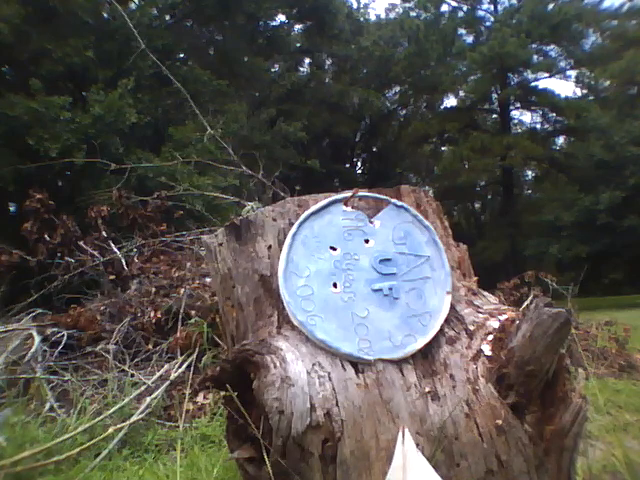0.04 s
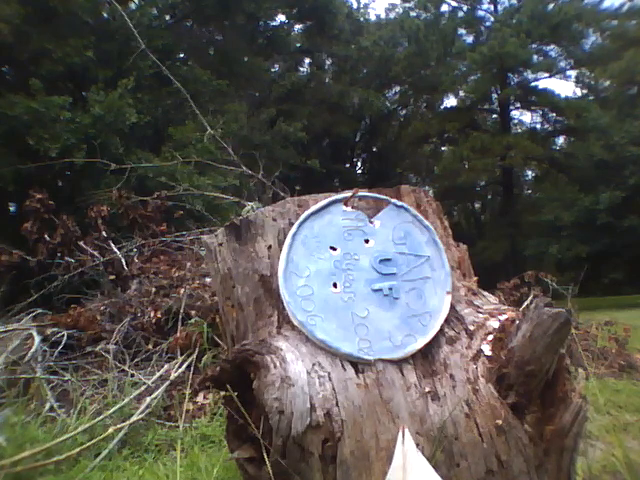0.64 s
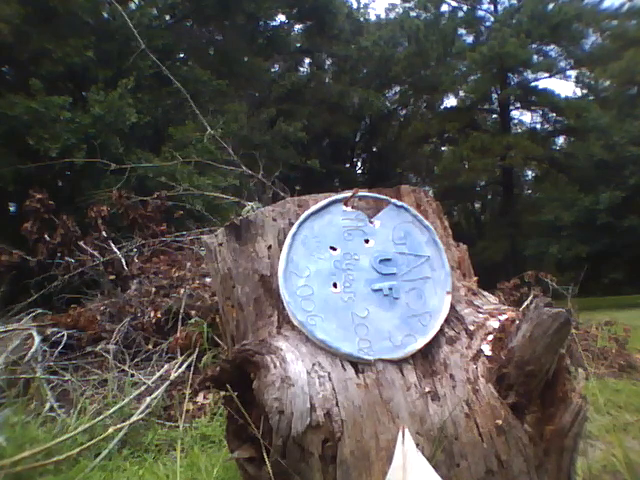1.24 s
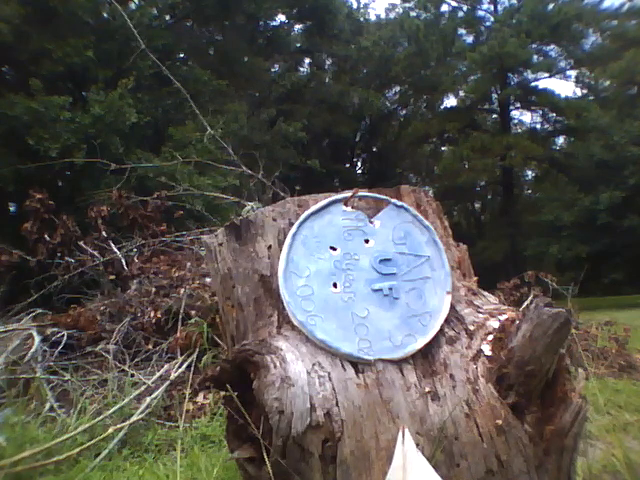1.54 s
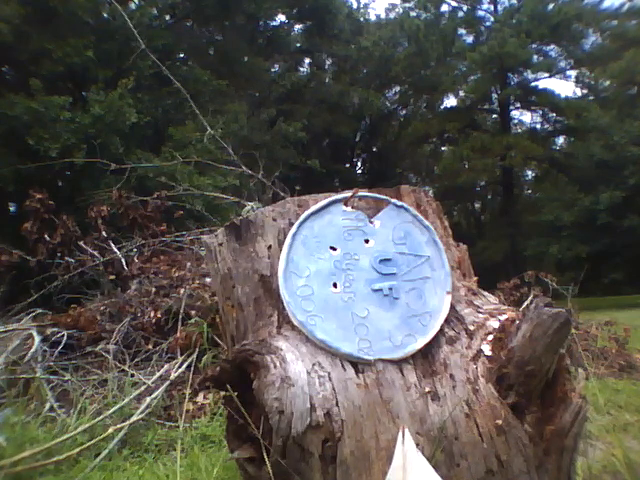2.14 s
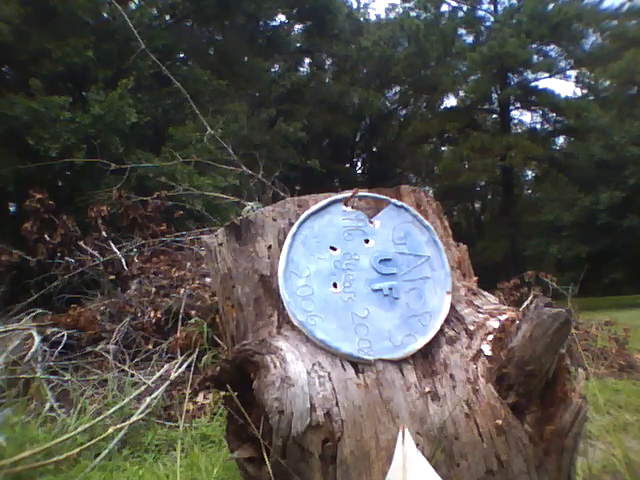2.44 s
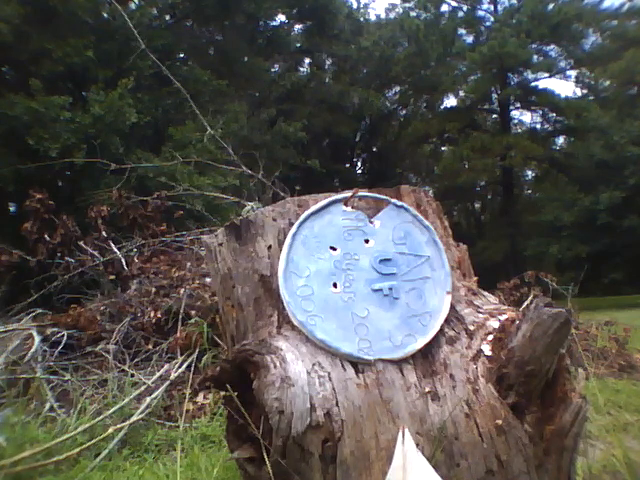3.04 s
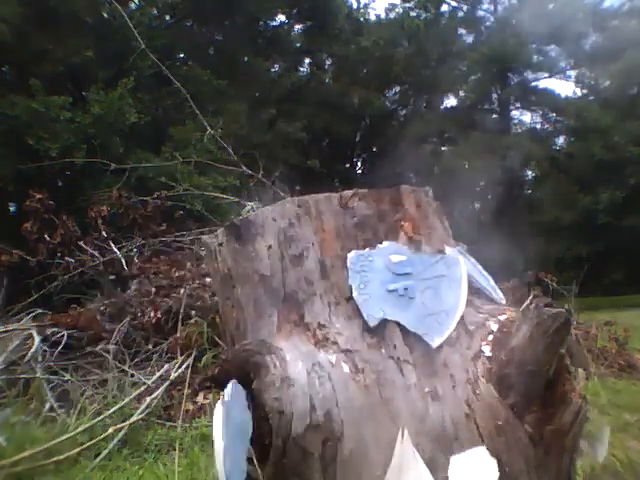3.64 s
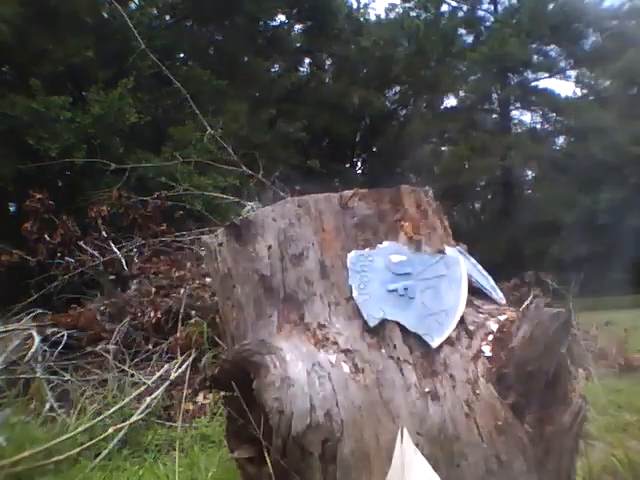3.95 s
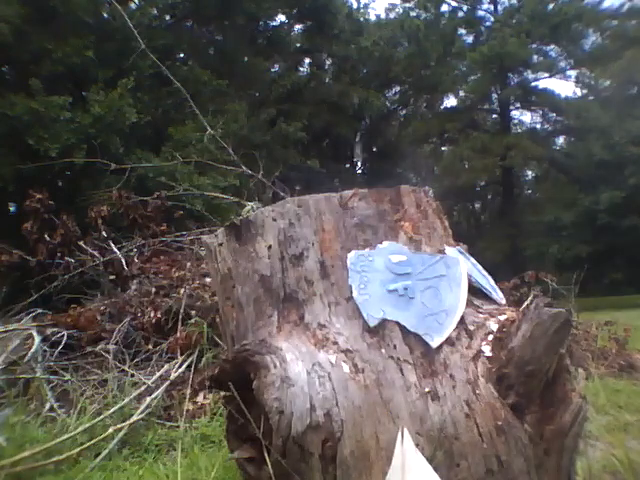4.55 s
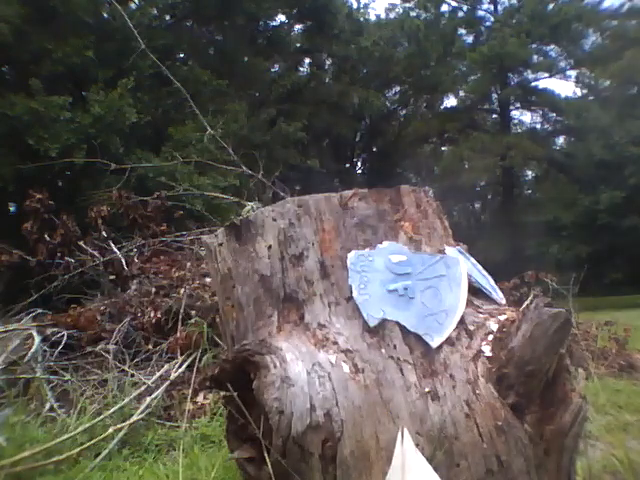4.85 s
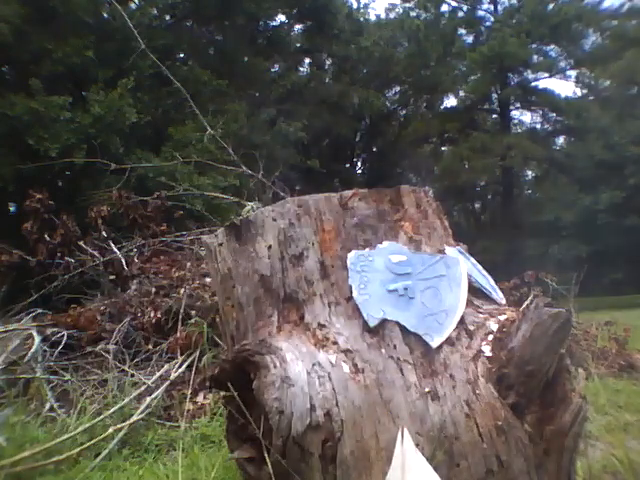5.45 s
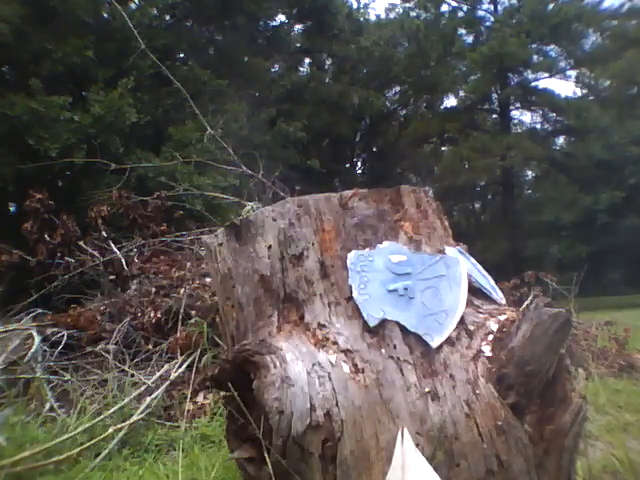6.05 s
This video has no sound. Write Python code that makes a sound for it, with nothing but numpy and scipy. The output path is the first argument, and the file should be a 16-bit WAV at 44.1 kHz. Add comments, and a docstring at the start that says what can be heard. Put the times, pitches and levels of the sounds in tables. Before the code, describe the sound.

A bullet smashes a pottery plate with one loud crack that echoes through the woods as shards knock and clink down.

```python
"""Quiet outdoor air, a light breeze and the hiss of the camera's electronics, from a small camera at the edge
of a wood. Three seconds in, a rifle bullet smashes a pottery plate on a stump close by and overloads the
microphone. The shot slaps back from brush and trunks, then rolls away through the trees, ever duller. Shards
knock, clink and thud on wood and turf while grit showers down."""
import sys
import numpy as np
from scipy import signal
from scipy.fft import rfft, irfft
from scipy.io import wavfile
from scipy.ndimage import uniform_filter1d

SR = 44100
rng = np.random.default_rng(int(sys.argv[2]) if len(sys.argv) > 2 else 0)


def store_pcm(level_fs):
    """Save levels as 16-bit WAV."""
    pcm = np.round(np.clip(level_fs, -1, 1) * 32767).astype(np.int16)
    wavfile.write(sys.argv[1], SR, np.atleast_2d(pcm).T)


N = 277389
TIME = np.arange(N) / SR
FREQS = np.maximum(np.arange(N // 2 + 1) * SR / N, 1)
TOP_HZ = 15700  # upper edge of the camera's sound


def undb(db):
    """Decibels to gain."""
    return 10 ** (np.asarray(db) / 20)


def unit(x):
    """Scale to rms 1."""
    return x / np.sqrt(np.mean(x ** 2))


def fade(age, t60):
    """Exponential decay, 60 dB down after t60."""
    return np.exp(-np.log(1000) * age / t60)


def swell(age, rise, t60):
    """A straight rise from silence, then an exponential decay."""
    return np.clip(age / rise, 0, 1) * fade(np.maximum(age - rise, 0), t60)


def add(track, start, sound):
    """Mix a sound into the track at a time in seconds."""
    i = int(start * SR)
    track[i:i + len(sound)] += sound[:N - i]


def colour(x, spectrum):
    """Filter a signal by a curve of (Hz, dB) points and scale it to rms 1."""
    hz, db = np.transpose(spectrum)
    gain = undb(np.interp(np.log(FREQS), np.log(hz), db))
    return unit(irfft(rfft(x) * gain, N))


def walk(rate):
    """Random levels held for 1 / rate seconds and smoothed twice, at rms 1."""
    hold = int(SR / rate)
    steps = np.repeat(rng.standard_normal(N // hold + 1), hold)
    return unit(uniform_filter1d(uniform_filter1d(steps, hold), hold)[:N])


def grains(per_second, scatter_db):
    """Random clicks, many small and a few large."""
    clicks = (rng.random(N) < per_second / SR) * rng.standard_normal(N)
    return clicks * undb(scatter_db * rng.exponential(size=N))


def burst(hz, width_hz, rise, t60):
    """Noise in one broad resonance that swells and dies away."""
    age = TIME[:SR // 2]
    low = np.hypot(hz, width_hz / 2) - width_hz / 2
    band = signal.butter(1, [low, min(low + width_hz, SR / 2 - 1000)], "band", fs=SR, output="sos")
    noise = signal.sosfilt(band, rng.standard_normal(len(age)))
    # a slow blow holds little treble far above its resonance
    roof = signal.butter(2, min(2 * (hz + width_hz), TOP_HZ), fs=SR, output="sos")
    return unit(signal.sosfilt(roof, noise)) * swell(age, rise, t60)


def background(air_db=-50.5, swell_db=.06, flutter_db=.5, hiss_db=-47.5):
    """Softly stirring air under the even hiss of the camera's electronics."""
    # Spectra of the outdoor air and the hiss. Each row: frequency in Hz, relative level in dB.
    air_colour = [(12, -34.5), (20, -3), (90, 1), (123, -1.5), (287, -9.5), (331, -12), (355, -5),
                  (381, -12), (518, -13), (773, -18.5), (2290, -22.5), (3180, -19.5), (5600, -24),
                  (7280, -55.5), (12300, -120)]
    hiss_colour = [(4500, -39), (5600, -21), (7000, -12), (7600, -8), (8300, 2), (9200, -2), (10200, -1.5),
                   (11200, -8), (13000, -14), (15500, -17)]
    air = colour(rng.standard_normal(N), air_colour)
    air *= undb(air_db + swell_db * walk(1.5) + flutter_db * walk(12))
    return air + undb(hiss_db) * colour(rng.standard_normal(N), hiss_colour)


def breeze(lull_db=-68):
    """A low rumble of moving air that swells smoothly with each gust."""
    # The rumble's spectrum. Each row: frequency in Hz, relative level in dB.
    breeze_colour = [(60, -23.5), (150, 2), (260, -2.5), (450, -14), (1500, -40.5), (8000, -70)]
    # Light gusts. Each row: peak time in seconds, level in dB, half length in seconds.
    gusts = [(.18, -53, .22), (2.4, -62, .25), (5, -59.5, .3)]
    power = sum(undb(db) ** 2 * np.exp(-((TIME - peak) / half) ** 2) for peak, db, half in gusts)
    return colour(rng.standard_normal(N), breeze_colour) * np.sqrt(undb(lull_db) ** 2 + power)


def woods(spectrum, start, rise, level_db, spread_s, patchy_db):
    """Countless small echoes from ever deeper trees; distance weakens them, foliage soaks up treble."""
    # How long sound lasts among the trees. Each row: frequency in Hz, t60 in seconds.
    decay_times = [(50, 1.7), (200, 1.75), (600, 2.1), (1200, 2.66), (1800, 2.62), (2800, 1.9),
                   (4400, 1.17), (7000, 1.2), (15500, .55)]
    hz, t60 = np.transpose(decay_times)
    scatter = rfft(colour(grains(20000, scatter_db=.41), spectrum))
    age = np.maximum(TIME - start, 0)
    out = np.zeros(N)
    for share, band_t60 in zip(np.eye(len(hz)), t60):
        band = irfft(scatter * np.interp(np.log(FREQS), np.log(hz), share), N)
        out += band * fade(age, band_t60) * undb(patchy_db * walk(60))
    spreading = 1 / np.sqrt(1 + age / spread_s)
    return undb(level_db) * out * np.minimum(age / rise, 1) * spreading


def far_echoes():
    """The wood returns the bullet's sharp crack, then the rifle's duller report, which the bullet outran."""
    # What the trees throw back of each. Each row: frequency in Hz, relative level in dB.
    crack_colour = [(40, -21), (150, -19), (380, -22), (750, -8), (1600, 3), (2650, 0), (3250, -6),
                    (4500, 7.5), (5800, -8), (7000, -7.5), (9500, -10.5), (15500, -22)]
    report_colour = [(40, -16), (170, -13), (350, -13), (700, -3), (1200, 1), (1700, -.5), (2400, -1.5),
                     (3300, -13), (4500, -11), (8000, -24), (15500, -37.5)]
    crack = woods(crack_colour, start=3.138, rise=.01, level_db=-8.5, spread_s=.068, patchy_db=1.5)
    report = woods(report_colour, start=3.232, rise=.0083, level_db=-16.2, spread_s=.12, patchy_db=1.9)
    return crack + report


def near_echoes():
    """Undergrowth, brush and near trunks throw back the shot; a more smeared slap lasts longer."""
    # Undergrowth round the stump answers at once. Each row: centre in Hz, width in Hz, level in dB.
    undergrowth = [(190, 260, -31.5), (2480, 2400, -16)]
    # Distinct slaps. Each row: start in seconds, level in dB, centre in Hz, smear in seconds.
    slaps = [(3.127, -7.5, 4700, .023), (3.147, -8.5, 1400, .011), (3.18, -11, 950, .0042),
             (3.182, -14, 4000, .002), (3.2308, -5, 2300, .0002), (3.2422, -7, 1600, .001),
             (3.254, -12.5, 1800, .002), (3.271, -8, 1600, .004), (3.315, -14, 2300, .0003),
             (3.326, -13.5, 1000, .005), (3.3395, -7, 1050, .0003), (3.359, -13.5, 1100, .003)]
    out = np.zeros(N)
    for hz, width_hz, db in undergrowth:
        add(out, 3.107, undb(db) * burst(hz, width_hz, rise=.0065, t60=.23))
    for start, db, hz, smear in slaps:
        smear_ms = 1000 * smear
        add(out, start, undb(db) * burst(hz, width_hz=.95 * hz, rise=smear, t60=.04 * smear_ms ** .3))
    return out


def grit():
    """Crumbs and dust tick on bark and grass in a dying shower; landing pieces kick up fresh sprays."""
    # The ticks' spectrum. Each row: frequency in Hz, relative level in dB.
    grit_colour = [(1000, -16), (2500, 1), (4000, -3), (7000, -7.5), (10500, -8), (15500, -14)]
    # Sprays of crumbs. Each row, as for the shower: start in seconds, level in dB, rise and t60 in seconds.
    sprays = [(3.41, -25.5, .05, .35), (3.556, -31.5, .008, .14), (3.79, -39.5, .012, .16),
              (3.897, -33.5, .02, .3)]
    shower = (3.13, -26.5, .07, 1.7)
    power = sum((undb(db) * swell(TIME - start, rise, t60)) ** 2
                for start, db, rise, t60 in [shower, *sprays])
    return colour(grains(6000, scatter_db=1.8), grit_colour) * np.sqrt(power)


def thuds():
    """Big pieces land on wood and turf with a dull bump and a rustle of dry stalks."""
    # Each row: start in seconds, level in dB, centre and width in Hz, t60 in seconds, relative rustle in dB.
    landings = [(3.409, -30, 85, 130, .07, -12), (3.457, -35.5, 190, 250, 0.13, -6),
                (3.672, -34.5, 520, 260, 0.04, -4), (3.805, -35.5, 140, 130, .11, -6),
                (3.8945, -26.5, 440, 140, .075, -1), (3.915, -34, 350, 300, .1, -3)]
    out = np.zeros(N)
    for start, db, hz, width_hz, t60, rustle_db in landings:
        add(out, start, undb(db) * burst(hz, width_hz, rise=.00067, t60=t60))
        add(out, start, undb(db + rustle_db) * burst(2000, 5000, rise=.00056, t60=t60))
    return out


def strikes(contacts, modes, tick_t60, spot_scatter_db=1.2):
    """Each contact is a short tick and rings the modes, their mix changing with the spot that is hit."""
    out, age = np.zeros(N), TIME[:SR // 2]
    hz, db, t60 = np.transpose(modes)[:, :, None]
    for start, hit_db, pitch, tick_db, contact_hz in contacts:
        stretch = pitch ** -3.2  # bigger, lower pieces ring longer
        strength = undb(db + spot_scatter_db * rng.standard_normal(hz.shape))
        strength *= rng.choice([-1, 1], hz.shape)
        ring = np.sum(strength * np.sin(2 * np.pi * hz * pitch * age) * fade(age, t60 * stretch), axis=0)
        tick = undb(tick_db) * burst(5000, 5500, rise=.0001, t60=tick_t60 * stretch)
        # a softer contact pushes for longer and excites less treble
        softness = signal.butter(2, min(contact_hz, TOP_HZ), fs=SR, output="sos")
        add(out, start, undb(hit_db) * signal.sosfilt(softness, ring + tick))
    return out


def shards():
    """Flying shards knock against things and barely ring; one lands on another, clinks and bounces."""
    # Contacts. Each row: start in seconds, level in dB, pitch ratio, relative tick in dB, cut-off in Hz.
    knocks = [(3.4067, 16, 1.03, -18, 12000), (3.417, -14, 1.2, -12, 6000), (3.4533, -8.5, 1.12, -4, 11000),
              (3.4706, 16, 1.03, -17, 12000), (3.5534, -9.5, 1, -9, 10000), (3.6735, -16.5, .72, 0, 3000),
              (4.622, -45, .7, -3.5, 3500), (4.808, -42, .7, 5, 4800), (5.075, -48, .62, -4, 2400),
              (5.166, -45, .62, -2, 2600)]
    clinks = [(4.0663, -15.5, 1, -4, 14000), (4.0697, -23, .98, 0, 14000), (4.0838, -22, 1, -6, 8000)]
    # Pottery modes at pitch ratio 1. Each row: frequency in Hz, relative level in dB, t60 in seconds.
    knock_modes = [(2100, -13, .008), (2650, -10, 0.01), (3270, -7.5, 0.007), (3860, 0.5, 0.0053),
                   (4185, -1, 0.0053), (5380, -25, .005), (6200, -5.5, 0.0029), (8610, -7.5, 0.0019),
                   (10500, -15, 0.003)]
    clink_modes = [(765, -14, .04), (1530, -14, .035), (2602, 1, .036), (2570, -8, 0.055), (3910, -6, .018),
                   (4400, -8, .018), (4850, -7, .058), (6140, -3.5, .028), (6480, -11, 0.025),
                   (7160, -9, 0.033), (7380, -10, .035), (9800, -7, .027), (10170, -7, 0.044),
                   (13200, -13, .03), (14250, -11, .022)]
    return strikes(knocks, knock_modes, tick_t60=.0052) + strikes(clinks, clink_modes, tick_t60=.023)


def impact():
    """Close to the microphone, the bullet cracks, thumps into the stump and bursts the plate."""
    # Each row: start in seconds, level in dB, centre and width in Hz, t60 in seconds.
    blows = [(3.0768, 21.5, 2800, 699.4, 0.032), (3.0775, 10, 900, 1500, 0.032),
             (3.082, 9.5, 1296, 1200, 0.026), (3.084, 13.5, 760, 300, .026),
             (3.086, 3.5, 3200, 6000, 0.054), (3.087, -7.5, 180, 60, .08), (3.087, -10, 36, 52, .09),
             (3.096, -1, 4500, 6000, .035), (3.099, 0, 2300, 450, 0.043), (3.1, -10, 1009, 894, 0.083)]
    out = np.zeros(N)
    for start, db, hz, width_hz, t60 in blows:
        add(out, start, undb(db) * burst(hz, width_hz, rise=.0002, t60=t60))
    return out


def scene():
    """The shot, its echoes and the falling pieces over the outdoor air, at one microphone."""
    rolling_tail = far_echoes()
    debris = shards() + thuds() + grit()
    return (impact() + near_echoes() + rolling_tail + debris + breeze() + background())[None]


def record(dry):
    """The camera clips hard at full scale and cuts the top treble."""
    top_cut = signal.ellip(10, .1, 80, TOP_HZ, fs=SR, output="sos")
    return signal.sosfilt(top_cut, np.clip(dry, -1, 1))


dry = scene()
out = record(dry)
store_pcm(out)
```